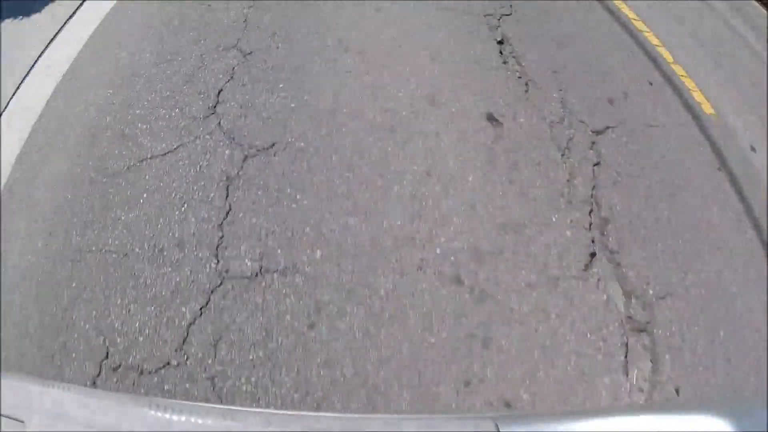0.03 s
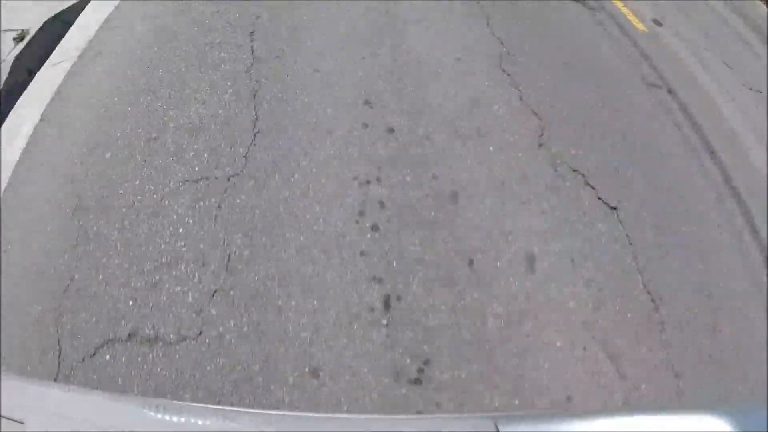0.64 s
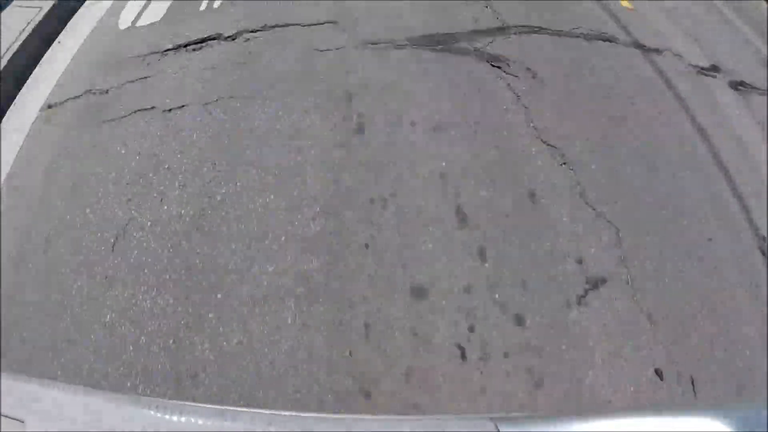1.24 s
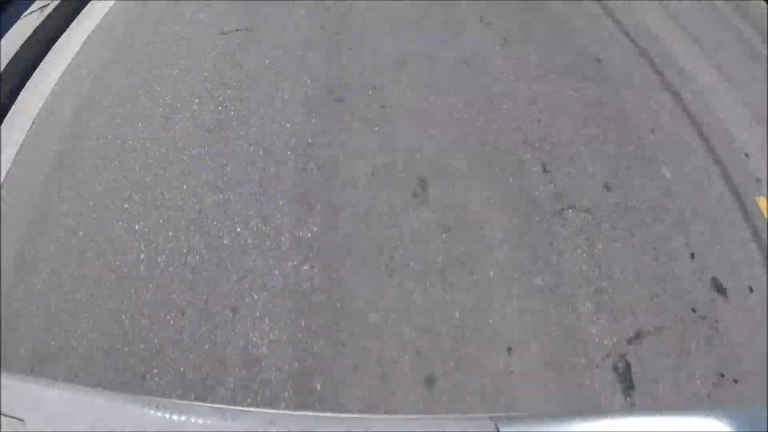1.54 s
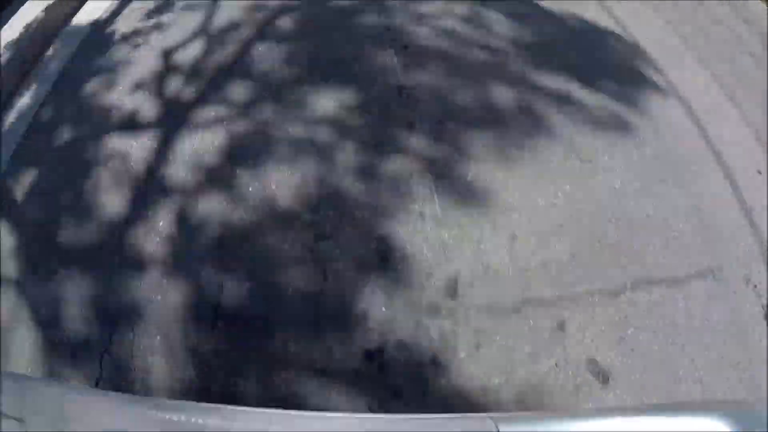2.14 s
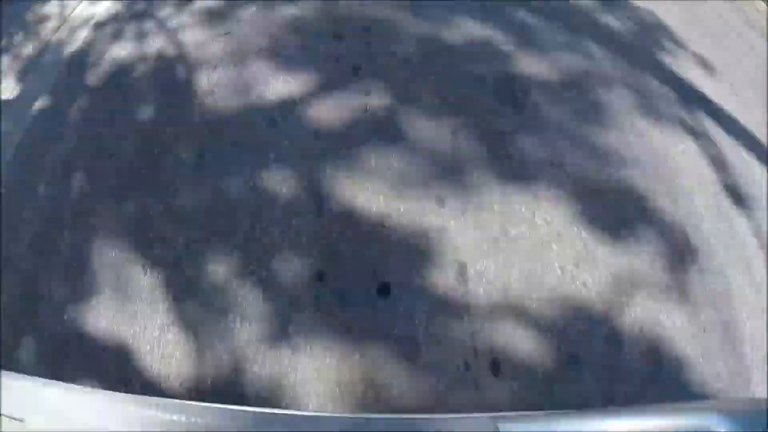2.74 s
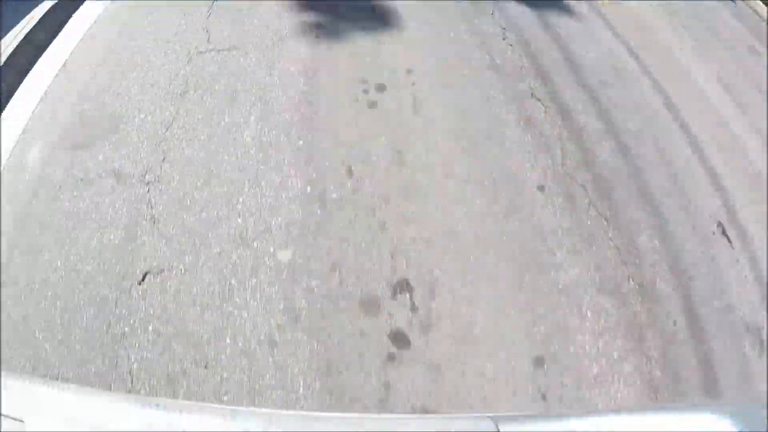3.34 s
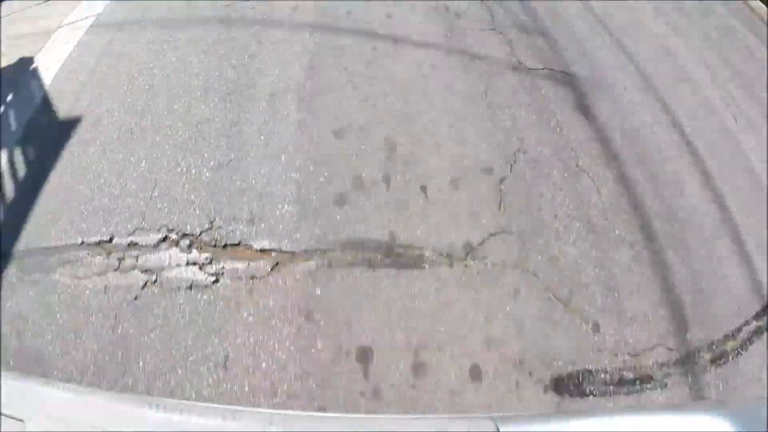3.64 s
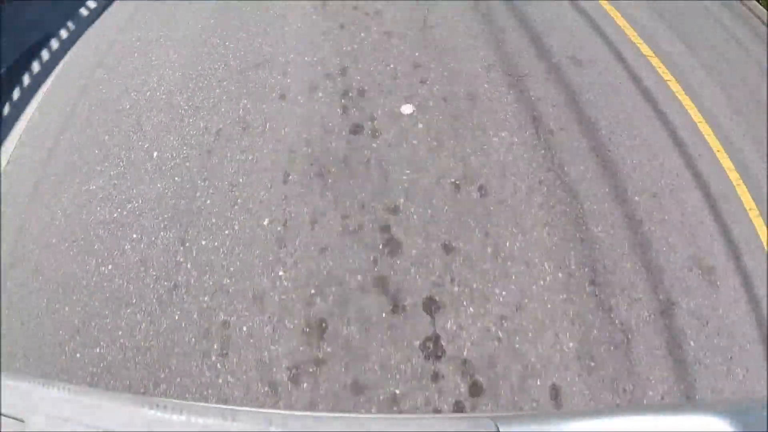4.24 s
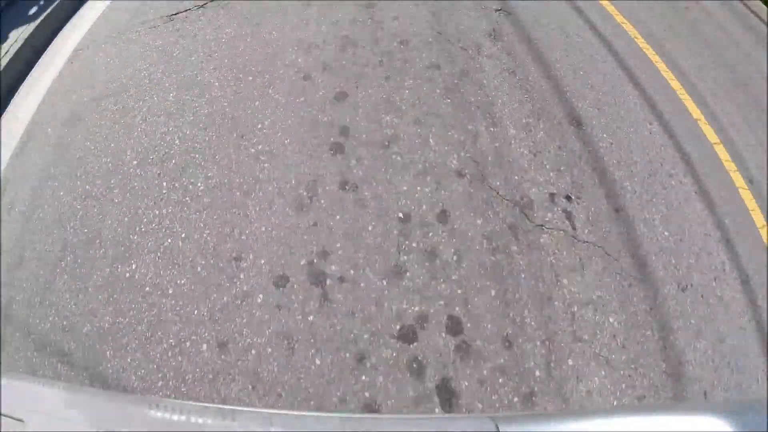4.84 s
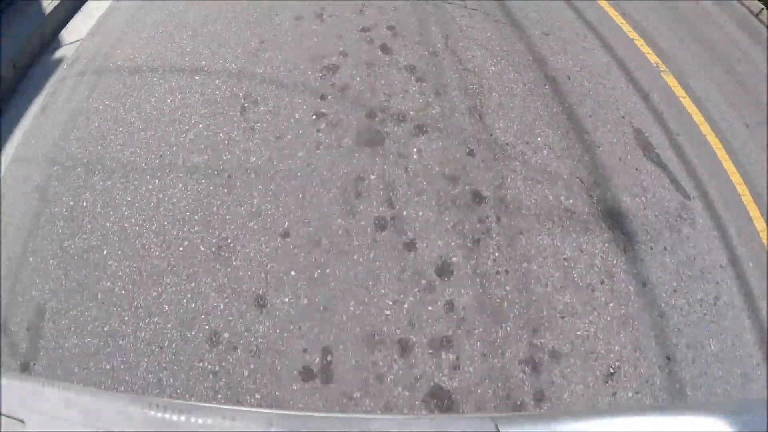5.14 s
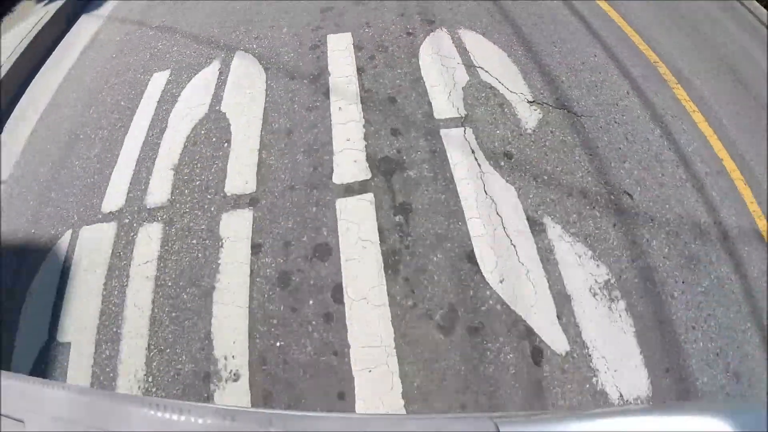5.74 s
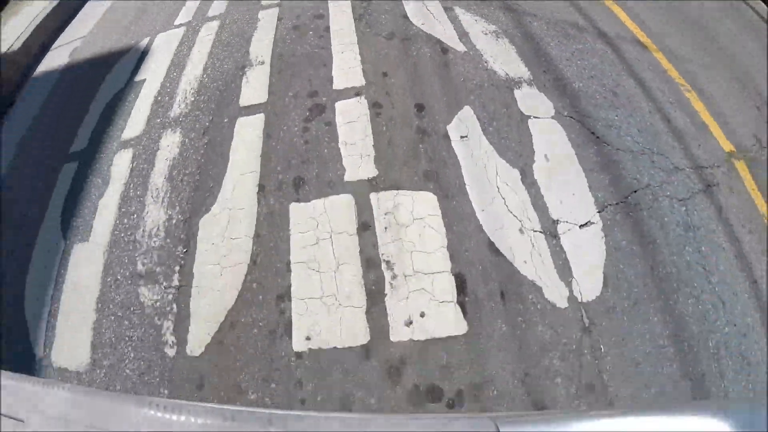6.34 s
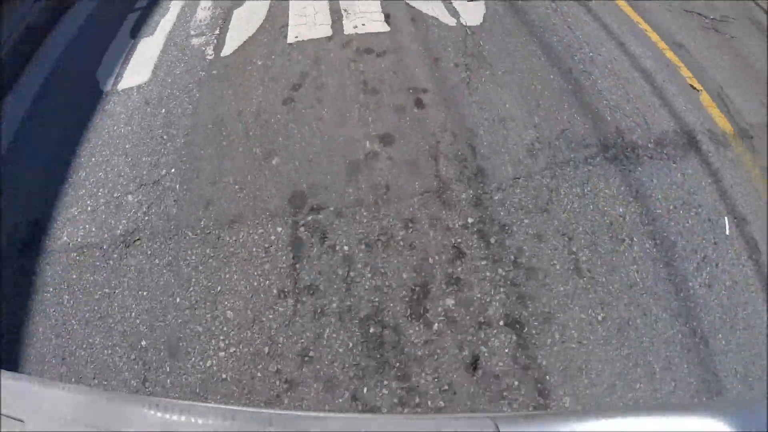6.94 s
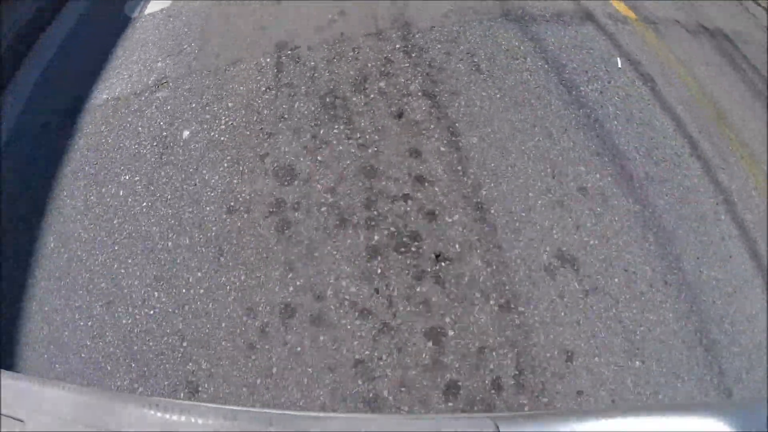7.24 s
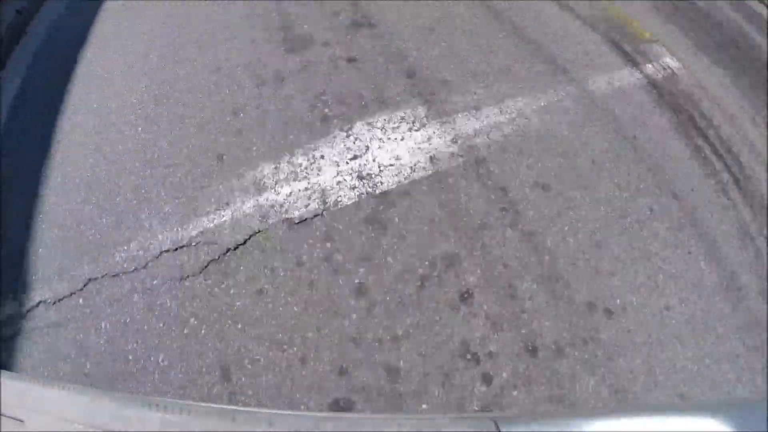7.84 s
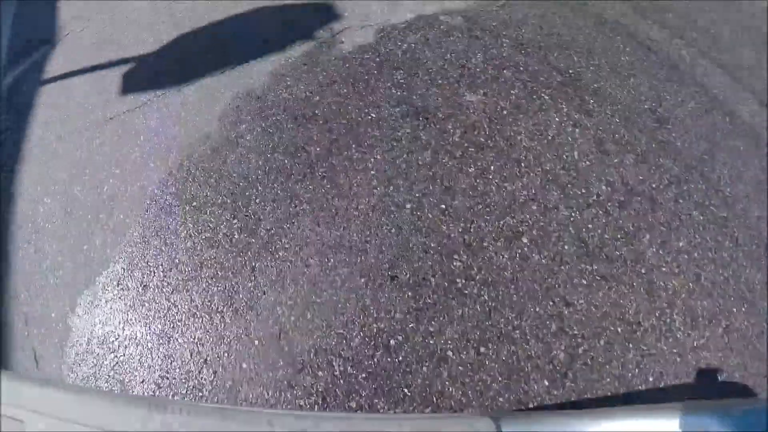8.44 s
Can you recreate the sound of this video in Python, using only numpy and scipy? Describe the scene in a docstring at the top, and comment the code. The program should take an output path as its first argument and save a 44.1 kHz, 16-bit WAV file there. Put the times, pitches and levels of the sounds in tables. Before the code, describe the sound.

Heard from a microphone low on a car's body, tyres roar and knock over cracked asphalt while the plastic mount rattles in sharp clicks and the engine drops to idle. Another car swishes past and fades down the street. The car slows, small stones snap under the tyres and a faint whine swells. Near the end the engine labours briefly, then speeds up to pull away.

```python
"""A car rolls over cracked asphalt, heard from a camera fixed low on its body. At first the tyres roar and
knock over cracks, and the jolts rattle the camera mount while the engine drops to idle. At about 2.5 s
another car swishes past in the next lane, and its tyre roar lingers down the street. Our car slows,
small stones snap under its tyres, and a faint whine swells as it coasts. Near 6.7 s the pedal goes down:
the engine labours for a moment, then speeds up to pull away."""
import sys
import numpy as np
from scipy import signal
from scipy.fft import rfft, irfft, next_fast_len
from scipy.io import wavfile
from scipy.ndimage import uniform_filter1d, map_coordinates

SR = 44100
rng = np.random.default_rng(int(sys.argv[2]) if len(sys.argv) > 2 else 0)


def wav_record(signal):
    """Record a signal, one row per channel, as 16-bit PCM in the file named by sys.argv[1]."""
    frames = np.transpose(np.atleast_2d(signal))
    bounded = np.clip(frames, -1, 1)
    # unit amplitude maps onto the largest positive 16-bit level
    quanta = np.round(bounded * 32767).astype(np.int16)
    wavfile.write(sys.argv[1], SR, quanta)


N = 375281

# the pedal is lifted, then pressed again: (time [s], throttle [0-1])
THROTTLE = [(0, 0.9), (.45, 0.5), (.8, 0.02), (6.63, 0.01), (6.8, 1), (8.51, 1)]
# how fast our car rolls: (time [s], speed [share of cruising speed])
ROAD_SPEED = [(0, 0.95), (1.4, 0.85), (2.6, 0.93), (3.6, 0.68), (4.4, 0.54), (5.1, 0.37), (6.3, 0.35),
              (7.2, 0.35), (8.51, 0.38)]
# tone colour of rushing air: (frequency [Hz], level [dB])
AIR_HISS = [(1000, -11), (1700, 10), (2200, 8), (2700, 0.5), (3100, 4.5), (3550, 3), (3950, -10.5),
            (4450, -7.5), (4800, -7.5), (5300, -12.5), (6700, -13.5), (8500, -22.5), (10200, -27),
            (15000, -48.5)]
# tone colour of tyres heard from afar: (frequency [Hz], level [dB])
DISTANT_ROAR = [(500, -16), (790, -15), (920, -4), (1150, 2), (1400, -7.5), (1700, -14), (1950, -50),
                (2200, -38), (2700, -36), (3400, -39.5), (4000, -43.5), (15000, -61.5)]
# tone colour of the hiss behind a car and along the street: (frequency [Hz], level [dB])
WAKE_HISS = [(1000, -6), (1900, 4), (2650, -2), (3500, 5), (4200, -11), (4650, -8), (4800, 0), (5000, -8),
             (6100, -5), (8000, -17), (9000, -12), (10500, -27), (12200, -26), (15000, -37)]


def undb(db):
    """Turn decibels into a gain."""
    return 10 ** (np.asarray(db) / 20)


def unit(x):
    """Scale a sound to an average (rms) level of 1."""
    return x / np.sqrt(np.mean(x ** 2))


def curves(table):
    """Join the points of a timed table by straight lines, one curve per value column."""
    times, *columns = np.transpose(table)
    return [np.interp(np.arange(N) / SR, times, column) for column in columns]


def hump(s, half_s):
    """A smooth swell from 0 to 1 and back, centred on time s."""
    return np.exp(-((np.arange(N) / SR - s) / half_s) ** 2)


def wander(rate):
    """A smooth random curve of size about 1 that takes `rate` new values a second."""
    hold = max(int(SR / rate), 2)
    steps = np.repeat(rng.standard_normal(N // hold + 1), hold)
    return unit(uniform_filter1d(uniform_filter1d(steps, hold), hold)[:N])


def grains(rate, spread_db):
    """Noise broken into short grains of uneven strength, `rate` a second."""
    return rng.standard_normal(N) * undb(spread_db * wander(rate))


def colour(x, points):
    """Give a sound the tone colour of (frequency [Hz], level [dB]) points, at an average level of 1."""
    size = next_fast_len(N)
    hz, db = np.transpose(points)
    bins = np.maximum(np.fft.rfftfreq(size, 1 / SR), 1)
    gain = undb(np.interp(np.log(bins), np.log(hz), db))
    return unit(irfft(rfft(x, size) * gain, size)[:N])


def soften(x, hz):
    """Dull a sound by fading out what lies above hz."""
    return signal.sosfilt(signal.butter(2, min(hz, .45 * SR), fs=SR, output="sos"), x)


def resonate(x, hz, width):
    """Pass a sound twice through one resonance, keeping the band around hz."""
    peak = signal.iirpeak(hz, hz / width, fs=SR)
    return signal.lfilter(*peak, signal.lfilter(*peak, x))


def strike(modes, detune, tilt_db, samples):
    """One blow with peak 1; where it lands changes the pitch and strength of each ringing tone."""
    hz, ring_s, db = np.transpose(modes)
    t = np.arange(samples)[:, None] / SR
    pitch, strength = rng.standard_normal((2, len(hz)))
    signs = (-1) ** np.arange(len(hz))
    gain = signs * undb(db + 2.8 * strength + tilt_db * np.log2(hz / hz.mean()))
    fade = np.exp(-np.log(1000) * t / ring_s)
    ring = (gain * fade * np.sin(2 * np.pi * hz * (1 + detune * pitch) * t)).sum(axis=1)
    return ring / np.abs(ring).max()


def add(out, s, sound):
    """Mix a short sound in at time s."""
    start = max(int(s * SR), 0)
    out[start:start + len(sound)] += sound[:N - start]


def far_traffic():
    """Tyres further down the street swell and fade over a steady faint hiss."""
    # waves of traffic: (time [s], half length [s], roar level [dB], hiss level [dB])
    swells = [(0.297, 0.85, -34, -49.5), (4.802, 0.65, -40, -49.5), (6.75, 0.38, -37, -73),
              (7.6, 0.77, -35, -63)]
    roar_gain = sum(undb(db) * hump(s, half) for s, half, db, _ in swells)
    hiss_gain = sum(undb(db) * hump(s, half) for s, half, _, db in swells)
    roar = roar_gain * colour(grains(rate=90, spread_db=1.2), DISTANT_ROAR)
    hiss = hiss_gain * colour(rng.standard_normal(N), AIR_HISS)
    street = colour(rng.standard_normal(N), WAKE_HISS) * undb(-64)
    return roar + hiss + street


def coasting_whine():
    """A faint, unsteady tone, probably gear teeth, sinks while the car coasts."""
    # the falling tone: (time [s], pitch [Hz])
    pitch = [(4, 740), (6.45, 711.4), (7, 663), (7.6, 640)]
    hz, = curves(pitch)
    tone = np.sin(2 * np.pi * np.cumsum(hz) / SR + .9 * wander(20))
    return tone * undb(-47.5 + 3.5 * wander(16)) * hump(s=6.1, half_s=1.9)


def wake_rings():
    """The other car's hiss sings in narrow bands that swell in turn, most sinking as it drives away."""
    # the bands: (pitch [Hz], width [Hz], level [dB], loudest at [s], half length [s], glide [Hz/s])
    bands = [(1139, 140, -31, 3.1, 0.44, -59), (3454, 530, -48.5, 3.15, 0.48, 1.5),
             (4790, 180, -58.5, 3.33, .5, 1), (6200, 1300, -49, 2.73, 0.23, -600),
             (8750, 2200, -61, 2.98, 0.57, -700), (12800, 2800, -64, 2.68, .2, -1800)]
    t, out = np.arange(N) / SR, 0
    for hz, width, db, s, half, glide in bands:
        centre_hz = hz + glide * np.clip(t - s, -1, 1)
        # slow noise, shifted up to the band's pitch
        flutter = soften(rng.standard_normal(N) + 1j * rng.standard_normal(N), hz=width / 3)
        band = np.real(flutter * np.exp(2j * np.pi * np.cumsum(centre_hz) / SR))
        out = out + unit(band) * undb(db) * hump(s, half)
    return out


def other_car():
    """A passing car's tyres roar from afar; its engine and swish are heard only close by."""
    # tone colour of its swish as it comes nearer: (frequency [Hz], level [dB])
    front_colour = [(900, -7), (1900, 13), (2700, 5), (3250, 10), (4100, -6.5), (5300, 4), (6900, -11),
                    (7500, -2), (8800, -13.5), (10500, -10), (15000, -30)]
    # tone colour of its engine and body: (frequency [Hz], level [dB])
    body_colour = [(150, -28.5), (270, 5), (390, 10), (530, 2), (700, -22), (1200, -48), (6000, -93)]
    alongside_s, closing_m_per_s, lane_gap_m = 2.46, 16.24, 2.56
    t = np.arange(N) / SR
    along_m = closing_m_per_s * (t - alongside_s)
    distance_m = np.hypot(along_m, lane_gap_m)
    ahead = (1 - np.tanh((t - 2.34) / 0.054)) / 2  # 1 while our bonnet shields it
    behind = (1 + np.tanh((t - 2.7) / 0.11)) / 2  # rises to 1 as it goes behind us
    front = colour(grains(rate=420, spread_db=0.5), front_colour)
    rear = colour(grains(rate=740, spread_db=2.2), WAKE_HISS)
    swish = np.sqrt(1 - behind) * front + np.sqrt(behind) * rear
    swish *= lane_gap_m / distance_m * undb(-35.5 - 5.5 * ahead - 0.0754 * distance_m)
    # a weak echo off the road comes slightly later, so a shallow notch sweeps through the swish
    detour_m = 0.064 / distance_m
    lag = detour_m / 343 * SR
    swish = swish + 0.08 * map_coordinates(swish, [np.arange(N) - lag], order=3)
    # the roar beams along the road, so it dips when the car is right beside us
    beam_m, hiss_reach_m = 10.5, 7.5
    beam = 2 * beam_m * np.abs(along_m) / (beam_m ** 2 + along_m ** 2)
    roar = colour(grains(rate=90, spread_db=1.5), DISTANT_ROAR) * beam * undb(-26.5)
    hiss = colour(grains(rate=340, spread_db=1.3), AIR_HISS) * undb(-36)
    hiss /= np.hypot(1, along_m / hiss_reach_m)
    body = colour(grains(rate=23, spread_db=1.0), body_colour) * undb(-22)
    body /= 1 + ((t - 2.64) / 0.22) ** 2  # a brief swell just after it passes
    return swish + body + (roar + hiss) * undb(-6.5 * ahead - 0.0193 * distance_m)


def shudder():
    """The road shakes our car's body, deep and uneven; less so at low speed or with the pedal down."""
    throttle, = curves(THROTTLE)
    speed, = curves(ROAD_SPEED)
    shake = resonate(rng.standard_normal(N), hz=30.9, width=11)
    return unit(shake) * undb(-29) * speed * (1 - throttle / 2)


def engine_boom(hz, phase, throttle):
    """The firings make the car's body boom, each a little stronger or weaker than the last."""
    # the boom with the pedal lifted: (firing rate [Hz], level [dB])
    boom_levels = [(30, -15.5), (33, -14), (37.5, -16.5), (40, -18.5), (46, -22), (54, -23), (62, -24.5),
                   (80, -21)]
    firing = (phase / (2 * np.pi)).astype(int)
    uneven = soften(undb(0.9 * rng.standard_normal(N)[firing]) - 1, hz=4.9) + 1
    throb = 1 + 0.17 * np.cos(phase / 4)  # swells once in four firings
    level_db = np.interp(hz, *np.transpose(boom_levels)) + 2 * throttle
    return unit(uneven * throb * np.sin(phase)) * undb(level_db)


def exhaust(hz, phase, throttle):
    """Unequal cylinders throb in the pipe at idle; with the pedal down they blend into an even growl."""
    # exhaust tones: (pitch [times the firing rate], idling [dB], labouring [dB], pulling [dB])
    tones = [(.75, -50, -35, -29), (1.25, -50, -32, -32), (1.5, -46, -36, -36), (1.75, -46, -42, -35),
             (2, -35, -33, -27), (2.25, -44, -39, -33), (2.5, -45, -50, -50), (2.75, -49, -46, -30),
             (3, -46, -27, -38), (3.25, -42, -35, -32), (3.5, -46, -48, -50), (3.75, -44, -44, -36),
             (4, -46, -44, -35), (4.25, -42, -36, -36), (4.75, -56, -48, -37), (5, -46, -55, -39),
             (5.25, -48, -42, -42), (5.75, -44, -45, -38), (6, -46, -55, -36), (6.25, -46, -37, -42),
             (7, -43, -49, -42), (8, -41, -49, -43), (9, -39, -46, -41)]
    # how the pipe boosts or weakens them: (frequency [Hz], gain [dB])
    pipe = [(60, -3), (95, 3), (120, 3), (165, 3), (200, -3), (240, -7), (320, -10), (600, -16)]
    labour_hz, pull_hz = 33, 42  # the loaded engine labours below the first, pulls freely above the last
    spread = 3  # each throb lasts this many times longer under load
    note = 0
    for k, idle_db, labour_db, pull_db in tones:
        load_db = np.interp(hz, [labour_hz, pull_hz], [labour_db, pull_db])
        idling = (1 - throttle) * undb(idle_db) * np.cos(k * phase - k ** 2)
        loaded = throttle * undb(load_db) * np.cos(k * phase - spread * k ** 2)
        note = note + (idling + loaded) * undb(np.interp(k * hz, *np.transpose(pipe)))
    return note


def intake(hz, phase, throttle):
    """With the pedal down, air rushes in and high engine tones whine in the intake duct."""
    # the whining tones: (pitch [times the firing rate], level [dB])
    overtones = [(10, -9), (11, -1), (12, -1), (13, -7)]
    # duct resonances that the tones climb through: (frequency [Hz], width [Hz], gain [dB])
    duct = [(586, 100, -34.5), (735, 68, -36)]
    # tone colour of the rush in the air filter box: (frequency [Hz], level [dB])
    airbox = [(40, -7.5), (200, 7), (450, -4), (700, 5), (900, -5.5), (1300, -19.5), (6000, -63.5)]
    wobble = .55 * wander(32)
    tones = sum(undb(db + 1.5 * wander(18)) * np.sin(k * phase + wobble) for k, db in overtones)
    whine = sum(undb(db) * resonate(tones, centre, width) for centre, width, db in duct)
    hiss = colour(grains(rate=160, spread_db=0.7), AIR_HISS) * undb(-54)
    rush = colour(rng.standard_normal(N), airbox) * undb(-38.5)
    flow = undb(13 * np.log2(hz / 47.7))  # 13 dB louder each time the engine speed doubles
    return throttle * (whine + (hiss + rush) * flow)


def engine():
    """The firing of the cylinders drives the boom, the exhaust and the intake together."""
    # the engine drops to idle, labours, then pulls away: (time [s], firing rate [Hz])
    firing_rate = [(0, 84.5), (.2, 81.6), (.47, 77.5), (.8, 59), (1.25, 44.06), (1.7, 37.79), (3.35, 37.65),
                   (3.9, 39.55), (4.3, 37.96), (5.2, 36.61), (6.53, 37.2), (6.8, 29.6), (7, 32),
                   (7.2, 35.9), (7.8, 49.5), (8, 53.2), (8.17, 57.3), (8.51, 62.2)]
    hz, = curves(firing_rate)
    throttle, = curves(THROTTLE)
    phase = 2 * np.pi * np.cumsum(hz) / SR
    return engine_boom(hz, phase, throttle) + exhaust(hz, phase, throttle) + intake(hz, phase, throttle)


def rolling():
    """Rough asphalt shakes the body and drums on the tyres; air hisses out of their grooves."""
    # rough patches of road: (time [s], half length [s], rumble change [dB], tread change [dB])
    patches = [(0.258, 0.043, -0.5, -6), (0.92, 0.11, 3, 5.5), (2.047, 0.11, 3, 3), (2.53, 0.1, 3.5, 4.5),
               (3.5, 0.6, 1.5, 0.5), (6.665, .11, -0.5, 7.5)]
    # tone colour of the shaking body: (frequency [Hz], level [dB])
    rumble_colour = [(10, -34), (24, 10.5), (45, 0.5), (65, 1), (85, 4), (115, 1.5), (160, -0.5), (230, -1),
                     (300, -3.5), (370, -8.5), (470, -11), (700, -20), (1500, -70), (6000, -100)]
    # tone colour of the tread drumming on the road: (frequency [Hz], level [dB])
    tread_colour = [(500, -39.5), (720, -20), (820, -2), (890, 4.5), (960, 5), (1080, -1), (1300, -18),
                    (1600, -18.5), (2100, -23), (3300, -34), (6000, -48), (15000, -84.5)]
    # tone colour of the tyre's casing: (frequency [Hz], level [dB])
    casing_colour = [(200, -24), (400, -2), (480, -5.5), (570, 2), (690, -3.5), (800, -1.5), (950, -14.5),
                     (6000, -91)]
    doublings = np.log2(curves(ROAD_SPEED)[0])  # each layer gains its own dB per doubling of speed
    shake_db = sum(db * hump(s, half) for s, half, db, _ in patches)
    coarse_db = sum(db * hump(s, half) for s, half, _, db in patches)
    rumble = colour(grains(rate=30, spread_db=0.5), rumble_colour) * undb(-20 + 6 * doublings)
    tread = colour(grains(rate=120, spread_db=2.0), tread_colour) * undb(-24 + 10.5 * doublings)
    hiss = colour(grains(rate=300, spread_db=2.5), AIR_HISS) * undb(-48 + 14 * doublings)
    casing = colour(rng.standard_normal(N), casing_colour) * undb(-26.5 + 11 * doublings)
    return (rumble + casing) * undb(shake_db) + (tread + hiss) * undb(coarse_db)


def grit():
    """Small stones snap out from under the tread with a short, high knock."""
    # the stones: (time [s], level [dB])
    stones = [(4.232, -11), (4.554, -17), (5.993, -16.5), (6.153, -14.5), (6.868, -18), (7.4, -17),
              (7.546, -19.5)]
    # tones that ring in the tread: (pitch [Hz], time to fade by 60 dB [s], level [dB])
    tread_modes = [(980, .018, -5), (1170, .02, 0), (1450, .011, -9)]
    out = np.zeros(N)
    for s, db in stones:
        add(out, s, undb(db) * strike(tread_modes, detune=0.025, tilt_db=0, samples=1500))
    return soften(out, hz=2500)


def thuds():
    """The springs pass each bump on as a soft push that booms for a few cycles."""
    # the bumps: (time [s], level [dB], body resonance [Hz], rise to the peak [cycles])
    bumps = [(0.221, -18, 233, 0.56), (0.253, -8.5, 94.4, 0.89), (0.431, -10, 130, 0.83),
             (0.934, -6.5, 47, 0.83), (.955, -15, 167, 0.94), (1.15, -24, 233.7, .76),
             (2.049, -14, 80, .76), (2.168, -15, 108.9, 0.7), (2.52, -11, 78.6, .76),
             (2.741, -13, 520, 2.8), (2.742, -15, 338, 1.2)]
    out = np.zeros(N)
    t = np.arange(8000) / SR
    for s, db, hz, cycles in bumps:
        rise = t * hz / cycles
        add(out, s, undb(db) * rise * np.exp(1 - rise) * np.sin(2 * np.pi * hz * t))
    return out


def knocks():
    """A crack slaps the soft tread and rings the tyre and wheel arch."""
    # tyres striking cracks: (time [s], level [dB], brightness [dB per octave])
    cracks = [(.219, -2.5, 0), (.229, -6, 0), (.5, -13, 0), (.906, -3, 0), (.932, -3, 0), (.976, -6, 0),
              (.987, -6, 0), (1.039, -7.5, 0), (1.112, -5, 0), (1.125, -6, 0), (1.157, -5, 0),
              (1.236, -14.5, 0), (1.49, -9.5, 0), (1.932, -7, 6), (1.947, -7, 6), (2.268, -7.5, -2),
              (2.742, -7, -2), (3.576, -15, 0)]
    # tones that ring in the tyre and arch: (pitch [Hz], time to fade by 60 dB [s], level [dB])
    wheel_modes = [(238, 0.024, -2.5), (557, 0.066, -12), (752, 0.036, -6.5), (962, 0.041, -3.5),
                   (1163, 0.022, -11.5), (1515, 0.011, -19.5)]
    out = np.zeros(N)
    for s, db, tilt_db in cracks:
        add(out, s, undb(db) * strike(wheel_modes, detune=0.036, tilt_db=tilt_db, samples=3000))
    return soften(out, hz=2500)


def mount_rattle():
    """Hard plastic parts of the camera mount tap together for a millisecond and ring very briefly."""
    # the taps: (time [s], peak level [dB], brightness [dB per octave])
    taps = [(.1116, -22, -15), (.1195, -32, -11), (.3285, -24, -4), (.331, -26, -10), (.4738, -41, -8),
            (.51, -17, -10.5), (.53, -35, -12), (.5462, -18, -10.5), (.5574, -31, -5), (.5728, -15, -7.5),
            (.594, -27, -12), (.614, -17.5, -16), (.6334, -34, -12), (.6525, -25, -18), (.6905, -25, -12),
            (.7286, -21.5, -13), (.7721, -29.5, -16), (.903, -21, -24), (.9254, -25, 2), (.9452, -12, -4),
            (.9707, -10, -5), (.9887, -11.5, -9), (1.265, -35, -10), (1.3, -26.5, -15), (1.3065, -33, -7),
            (1.8591, -23, -15), (1.87, -29, -14), (2.0172, -17.5, -10.5), (2.0508, -31, -10),
            (2.0784, -17.5, -11), (2.1081, -29, -6), (2.1262, -17.5, -10), (2.131, -26, -9),
            (2.1364, -22, -14), (2.157, -25, -8), (2.169, -14.5, -12), (2.2024, -17, -3), (2.222, -30, -8),
            (2.2458, -32, -8), (2.2633, -32, -10), (7.5846, -40, 12)]
    # the mount's resonances: (frequency [Hz], width [Hz], level [dB])
    mount_modes = [(2400, 1200, -13), (3300, 900, -4.5), (4400, 1400, -8), (5450, 1100, 0),
                   (6600, 1200, -1), (8700, 2400, -14), (12300, 3500, -23)]
    firm_db, ring_hz = -15.5, 6500  # taps softer than firm_db ring mostly near ring_hz
    out = np.zeros(N)
    t = np.arange(1024) / SR
    contact = np.exp(-t / .0009) + .025 * np.exp(-t / .007)
    for s, db, tilt_db in taps:
        narrow_db = 0.94 * np.clip(firm_db - db, 0, 10)  # lost per octave away from ring_hz
        click = 0
        for hz, width, mode_db in mount_modes:
            ring = resonate(rng.standard_normal(len(t)) * contact, hz, width)
            ring_db = mode_db + tilt_db * np.log2(hz / 5500) - narrow_db * abs(np.log2(hz / ring_hz))
            click = click + ring * undb(ring_db)
        add(out, s, undb(db) * click / np.abs(click).max())
    return out


def scene():
    """Our car, its jolts and the street all reach one microphone."""
    own_car = engine() + shudder() + coasting_whine() + rolling()
    jolts = knocks() + grit() + thuds() + mount_rattle()
    street = other_car() + wake_rings() + far_traffic()
    return (own_car + jolts + street)[None]


def record(dry):
    """The camera rounds off the loudest peaks and cuts the highest treble."""
    top_hz = 15300
    rounded = np.tanh(0.55 * dry) / 0.53
    return signal.sosfilt(signal.ellip(8, .2, 70, top_hz, fs=SR, output="sos"), rounded)


dry = scene()
out = record(dry)
wav_record(out)
```